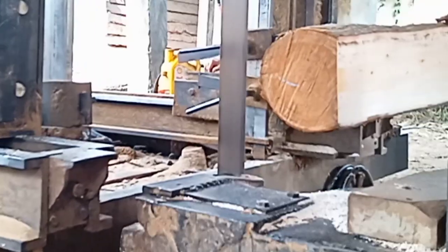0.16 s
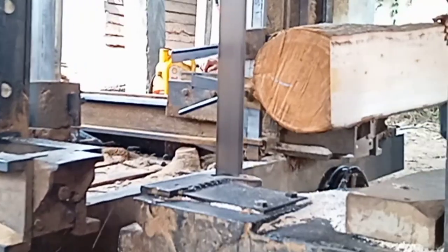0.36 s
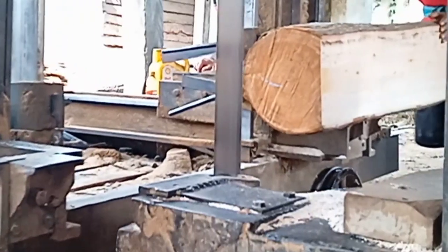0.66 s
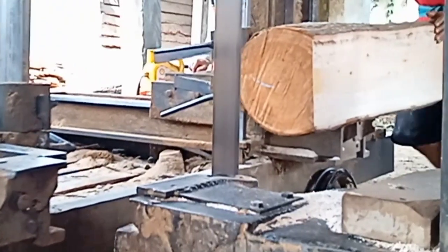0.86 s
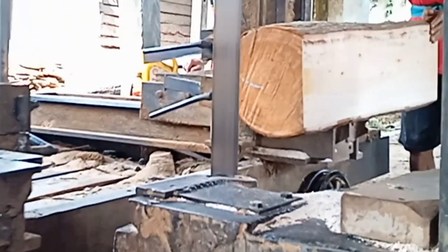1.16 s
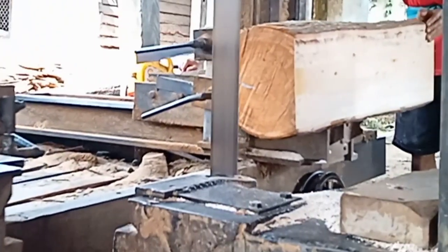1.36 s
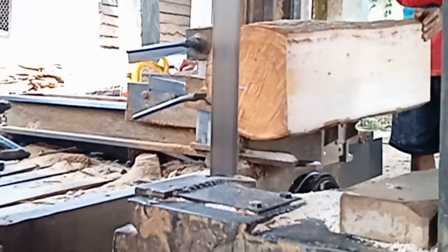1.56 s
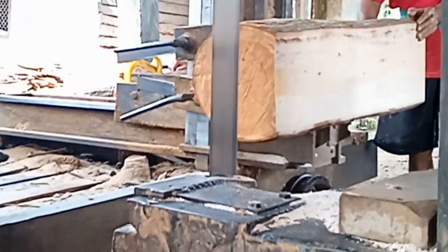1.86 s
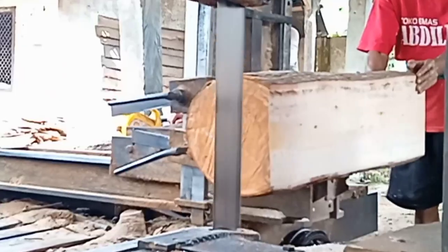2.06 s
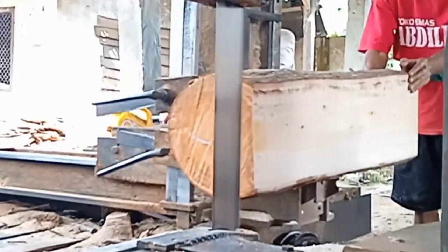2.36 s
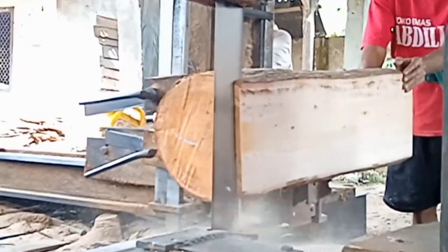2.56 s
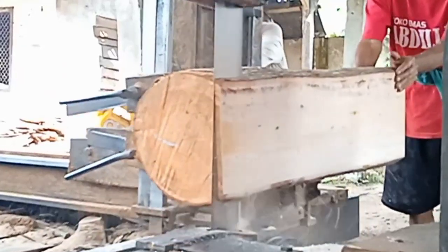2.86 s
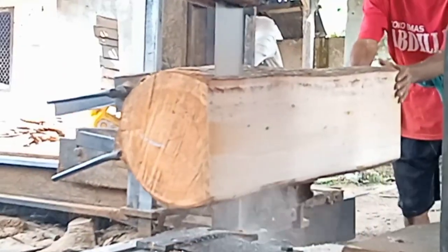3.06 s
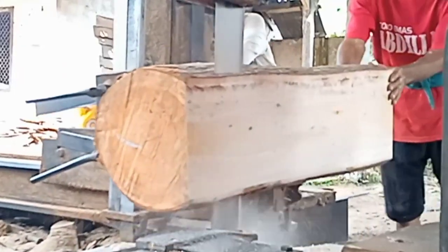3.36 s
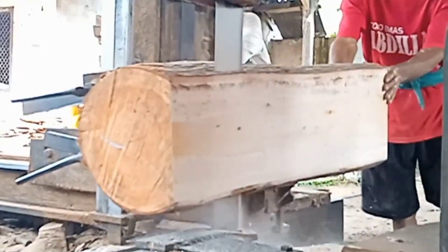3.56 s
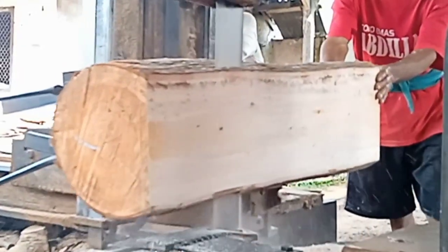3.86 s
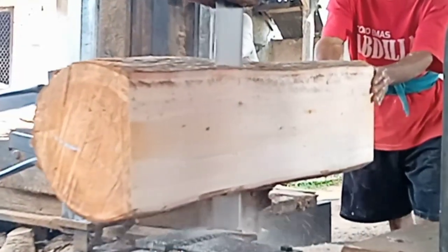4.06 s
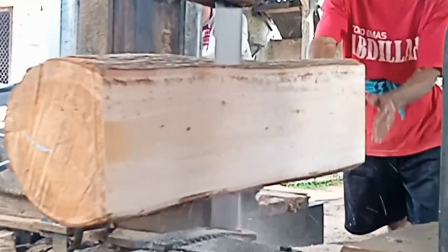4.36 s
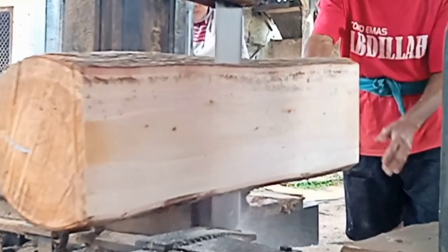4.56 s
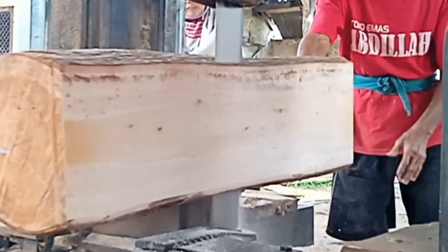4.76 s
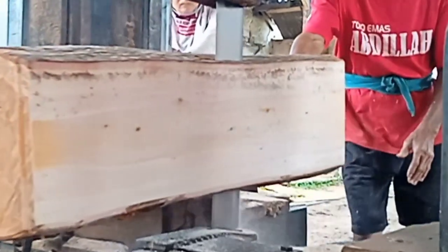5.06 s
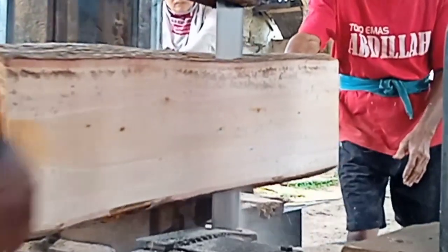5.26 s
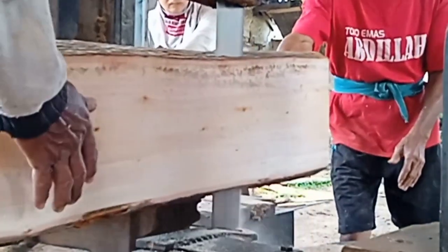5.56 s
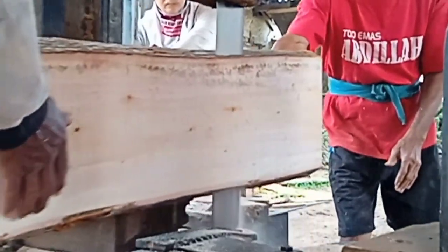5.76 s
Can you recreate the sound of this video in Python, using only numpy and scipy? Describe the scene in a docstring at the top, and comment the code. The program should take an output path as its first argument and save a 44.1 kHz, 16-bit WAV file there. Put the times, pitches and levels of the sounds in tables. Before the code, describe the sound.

A big band saw runs free with a bright ringing metallic hiss, then bites into a log, turning duller with wavering whines over sawdust hiss.

```python
"""A big band saw runs free in an open sawmill: its steel blade rings and throbs with each turn of the wheels.
Then a log is pushed in: the wood damps the ringing, the saw slows a little, and the teeth whine over sawdust hiss.
The ringing and hiss are shaped noise, and the whine is a stack of wavering tones at multiples of the tooth rate.
Throughout, the drive hums on steady tones while the housing, guards and frame rumble as noise-fed resonances."""
import sys
import numpy as np
from scipy import signal
from scipy.fft import rfft, irfft, next_fast_len
from scipy.io import wavfile
from scipy.ndimage import uniform_filter1d, map_coordinates

SR = 44100
rng = np.random.default_rng(int(sys.argv[2]) if len(sys.argv) > 2 else 0)


def materialize(psi):
    """Save the field psi as 16-bit PCM at rate SR to the path in sys.argv[1].

    A 1-D psi becomes a single channel; in a 2-D psi each row is a channel.
    """
    bounded = np.clip(np.atleast_2d(psi).T, -1, 1)
    quanta = np.round(bounded * 32767).astype(np.int16)
    wavfile.write(sys.argv[1], SR, quanta)


N = 261072

# In tables of resonances and noise colours, the levels are relative within the table.
# how fast teeth pass through the cut: time_s, teeth_per_s
TOOTH_SPEED = [(0, 1087), (2.5, 1087), (2.75, 1077), (3, 1071), (3.5, 1067), (3.9, 1064.5), (4.4, 1065),
               (5, 1067.5), (5.92, 1069)]
# resonances of the steel band: pitch_hz, width_hz, free_level_db, held_by_wood_level_db
BAND_MODES = [(1296, 125, -3, -6.5), (1365, 24, 2, -4), (1463, 46, -7, -22), (1721, 33, 2.5, -4.5),
              (1802, 92, -1, -1.5), (1885, 82, 1, -2.5), (1970, 28, 4, -4.5), (2084, 93, -1.5, 0),
              (2200, 48, -10, -16), (2297, 70, 0.5, -6), (2385, 44, -0.5, 1), (2420, 61, 0, -7),
              (2558, 81, 0.5, -7), (2646, 73, -1, -2), (2802, 79, 1, -3.5), (2917, 27, 1.5, -3),
              (3185, 81, -2.5, -4), (3300, 76, -1, -4), (3517, 70, -1, -8), (3790, 87, -1, -5.5),
              (3976, 82, -1, -6.5), (4780, 180, -5.5, -10.5), (5760, 480, -4.5, -13.5),
              (6620, 114, -3, -24), (6950, 110, -8.5, -26), (7450, 160, -8, -5), (7640, 89, -4, -19)]
# colour of the hiss of teeth in air: pitch_hz, level_db (per Hz)
AIR_COLOUR = [(900, -27), (1350, -3), (1600, 2.5), (2500, 5.5), (3020, 2.5), (3700, 6.5), (4300, 5),
              (5600, 5), (6200, 2), (7400, 4.5), (8100, 2), (9000, -2.5), (10800, -4.5), (12000, -10.5),
              (13900, -9), (15300, -3.5)]
# level of the band's ringing in the cut: time_s, level_db
CUT_RING = [(2.52, -30.5), (2.62, -30.5), (2.8, -30.5), (3.1, -29), (3.35, -29.5), (3.66, -29),
            (3.98, -29.5), (4.3, -30.5), (4.75, -30), (5.02, -32), (5.2, -30), (5.92, -31)]
# colour of the sawdust hiss: pitch_hz, level_db (per Hz)
DUST_COLOUR = [(900, -27), (1400, 2), (2500, 8.5), (3050, 2.5), (3800, 4.5), (5700, 4), (7600, 3),
               (8800, -1.5), (11000, -4), (13300, -9), (14300, -4.5), (15300, 0.5)]
# tooth harmonics 1 to 14 between swells, before they brighten: level_db
HARMONIC_LEVELS = [-56, -46, -45.5, -47.5, -45.5, -45.5, -47.5, -46.5, -52.5, -53, -54, -55, -61, -49]
# a harmonic sings out as the moving log tunes the blade to it: middle_s, length_s, harmonic, peak_db
SWELLS = [(2.6, .08, 14, -40), (2.7, .16, 13, -48.5), (2.73, .1, 14, -38), (2.752, .12, 5, -34.5),
          (2.772, .1, 7, -31), (2.82, .13, 12, -53), (2.84, 0.11, 9, -41), (2.84, .13, 10, -43.5),
          (2.93, .12, 7, -38), (3.16, 0.063, 6, -37), (3.17, .08, 7, -41), (3.2, .16, 14, -44.5),
          (3.358, 0.2, 5, -40), (3.39, 0.073, 7, -39), (3.42, 0.3, 4, -42), (3.54, 0.11, 5, -33),
          (3.625, 0.11, 5, -35.5), (3.627, 0.035, 3, -32.5), (3.64, .1, 2, -36.5), (3.64, .08, 9, -48),
          (3.67, .06, 7, -39), (3.68, 0.18, 6, -40.5), (3.71, 0.073, 8, -41), (3.79, 0.088, 1, -29),
          (3.81, .07, 4, -37), (3.873, 0.095, 1, -27), (3.905, 0.058, 7, -35.5), (3.922, 0.047, 5, -29.5),
          (3.923, .073, 6, -28), (4.053, 0.088, 6, -35), (4.1, .1, 9, -40), (4.09, .08, 10, -46),
          (4.182, .06, 8, -38), (4.33, .035, 3, -36), (4.41, .1, 8, -40), (4.48, 0.14, 5, -32.5),
          (4.5, 0.18, 9, -42), (4.517, 0.1, 4, -35.7), (4.578, .11, 1, -34.5), (4.58, .16, 11, -42),
          (4.735, .07, 4, -35), (4.78, .18, 10, -43), (4.82, .07, 14, -41), (4.85, .13, 13, -47),
          (4.867, .09, 7, -34), (4.9, 0.055, 3, -36.5), (4.91, 0.23, 6, -42), (5, 0.089, 9, -40.5),
          (4.95, 0.28, 1, -41), (5.037, .11, 7, -33), (5.1, .2, 5, -42.5), (5.11, .1, 4, -45.5),
          (5.2, 0.2, 6, -37.5), (5.2, .22, 12, -46.5), (5.25, .14, 10, -46), (5.28, .16, 11, -44.5),
          (5.32, .1, 7, -42), (5.33, 0.27, 8, -41), (5.35, .18, 9, -46), (5.313, .085, 1, -34.5),
          (5.43, .07, 1, -35), (5.4, 0.085, 4, -41), (5.56, .12, 6, -38.5), (5.62, .3, 12, -47),
          (5.673, 0.11, 5, -35.5), (5.72, 0.065, 9, -39), (5.72, .1, 8, -43), (5.74, 0.28, 7, -38),
          (5.815, 0.082, 6, -33), (5.84, 0.073, 4, -40), (5.91, .08, 7, -42), (5.9, .1, 8, -43)]
# brief harder scrapes on the band: middle_s, length_s, centre_hz, peak_db
SCRAPES = [(.094, .06, 2300, -30), (.254, .035, 3200, -29.5), (.645, .05, 2700, -28),
           (.69, .05, 1840, -29.5), (.808, .035, 1850, -28.5), (1.02, .09, 2550, -30.5),
           (1.23, .06, 2850, -31), (1.34, .05, 1900, -30), (1.493, .05, 1790, -29), (1.57, .06, 2600, -29),
           (1.79, .04, 3800, -29.5), (1.91, .04, 2000, -30), (2.46, .05, 3400, -31),
           (2.466, .05, 1940, -29), (3.47, .1, 2400, -33), (3.655, .05, 1830, -33), (4.755, .04, 1940, -33),
           (4.9, .03, 2550, -33), (5.197, .1, 1970, -34)]
# a wheel guard rings out: middle_s, length_s, pitch_hz, peak_db
GUARD_RINGS = [(0.118, 0.041, 701, -33), (0.423, 0.1, 642, -42), (1.065, .08, 645, -40),
               (2.88, 0.13, 629, -38.5), (5.31, 0.043, 750, -39), (5.528, 0.092, 820, -43.5),
               (5.66, .1, 905, -42), (5.73, 0.18, 734, -37.5)]
# steady tones of the drive: pitch_hz, level_db
DRIVE_HUM = [(99.5, -59), (144.5, -53.5)]
# resonances of the saw housing: pitch_hz, width_hz, level_db
HOUSING_MODES = [(278.6, 28, 2), (296.2, 21, 6), (340, 33, -5.5)]
# the housing booms: middle_s, length_s, rise_db
BOOMS = [(0.245, 0.052, 7.5), (3.625, 0.087, 6.5), (5.136, 0.069, 9.5), (5.597, 0.09, 2.5)]
# resonances of the wheel guards: pitch_hz, width_hz, level_db
GUARD_MODES = [(626.3, 13.4, 2), (643, 18, -3.5), (697, 28, 3.5), (746, 38, -0.5)]
# resonances of the frame: pitch_hz, width_hz, level_db
FRAME_MODES = [(492, 96, -9.5), (822, 29, -1), (889, 60, -2.5), (989, 11.4, 6), (1045.5, 28, 3),
               (1113, 30, 1), (1202, 48, 1.5)]
# colour of the low rumble: pitch_hz, level_db (per Hz)
RUMBLE_COLOUR = [(25, -39), (55, -21), (85, -15), (125, -8), (190, -2.5), (350, -3.5), (430, -5), (580, -5),
                 (900, -6.5), (1300, 0), (2500, -19.5)]

# the wood closes on the blade: start, time it takes, time until it grips hardest (s)
CONTACT_S, ENTRY_S, GRIP_S = 2.487, 0.045, 0.11
# usual levels: ringing and air hiss running free, sawdust hiss in the cut (dB)
FREE_RING_DB, AIR_DB, DUST_DB = -25, -26, -28
# dB of sawdust hiss for each dB of ringing in the cut
DUST_FOLLOWS = 0.86
# every harmonic wanders: depth (dB), changes per second; time the whine takes to build (s)
WANDER_DB, WANDER_RATE, BUILD_S = 1.5, 18, 0.36
# the whine flutters as the teeth catch: depth (dB), changes per second
FLUTTER_DB, FLUTTER_RATE = 1.2, 45
# steady rise of the 10th harmonic as the blade sinks in; others in proportion to their number (dB per second)
BRIGHTEN_DB_PER_S = 0.6
# roughness of a harmonic (0-1): between swells, at its purest, and the rise for each harmonic number
REST_ROUGH, SWELL_ROUGH, ROUGH_PER_ORDER = 0.5, 0.1, 0.03
# how far a scrape reaches to either side of its centre (Hz)
SCRAPE_REACH_HZ = 570
# usual shaking of the machine, and the guards' change once the wood calms them (dB)
HOUSING_DB, GUARDS_DB, FRAME_DB, GUARDS_HELD_DB = -44, -39, -37.5, -3
# how often a second the energy shifts between groups of resonances
SWAY_RATE = 26
# spray and air come in uneven gusts: depth (dB), width (Hz), duration (s)
PATCH_DB, PATCH_HZ, PATCH_S = 1.6, 450, 0.035
# no sound is kept from here up (Hz)
TOP_HZ = 15520


def free_blade(teeth):
    """The running band scrapes its guides and its resonances flutter; the teeth hiss through the air."""
    modes = [(hz, width, free_db) for hz, width, free_db, _ in BAND_MODES]
    ringing = ring(rng.standard_normal(N), modes, sway_db=2.0, count=9)
    steel = amp(FREE_RING_DB + 0.26 * wobble(28.35)) * ringing
    air = amp(AIR_DB + 0.53 * wobble(60)) * patchy(rush(AIR_COLOUR))
    return (steel + air) * throb(teeth, wheel_db=0.25)


def cutting(teeth):
    """Each tooth tears off a chip: the damped band rings and sawdust sprays out of the cut."""
    ring_db, = curves(CUT_RING)
    ring_db = ring_db + 0.4 * wobble(28)
    modes = [(hz, width, held_db) for hz, width, _, held_db in BAND_MODES]
    # one pulse of force for each tooth
    tearing = 1 + 0.38 * np.cos(2 * np.pi * teeth)
    ringing = ring(tearing * rng.standard_normal(N), modes, sway_db=1.5, count=7)
    steel = amp(ring_db) * ringing
    # unevenly set teeth make the spray flutter
    flutter = 1 + 0.07 * np.cos(2 * np.pi * teeth / 10.1)
    spray = unit(flutter * tearing * patchy(rush(DUST_COLOUR)))
    spray_db = DUST_DB + DUST_FOLLOWS * (ring_db - ring_db.mean()) - 0.49 * grip()
    dust = amp(spray_db + 1.1 * wobble(120)) * spray
    return (steel + dust) * throb(teeth, wheel_db=0.15)


def whine(teeth):
    """Teeth strike the wood about a thousand times a second; each harmonic wanders and turns purer as it swells."""
    sound = np.zeros(N)
    brighten_db = BRIGHTEN_DB_PER_S * (np.arange(N) / SR - CONTACT_S)
    for order, level_db in enumerate(HARMONIC_LEVELS, 1):
        rest_db = level_db + brighten_db * order / 10 + WANDER_DB * wobble(WANDER_RATE)
        rest = amp(rest_db) * ramp(CONTACT_S, BUILD_S)
        sung_power = sum((amp(peak_db) * swell(middle, length)) ** 2
                         for middle, length, harmonic, peak_db in SWELLS if round(harmonic) == order)
        power = rest ** 2 + sung_power
        # share of the power that comes from swells
        purity = sung_power / (power + 1e-20)
        rough = (1 - purity) * REST_ROUGH + purity * (SWELL_ROUGH + ROUGH_PER_ORDER * order)
        flutter = amp(FLUTTER_DB * wobble(FLUTTER_RATE))
        sound += np.sqrt(power) * flutter * tooth_tone(teeth, order, rough)
    return sound


def tooth_tone(teeth, order, rough):
    """One harmonic of the tooth rate, blurred by the grain; uneven tooth spacing adds sidebands."""
    blur = 1 + rough * (wobble(70) + 1j * wobble(70))
    blur = blur / np.sqrt(1 + 2 * rough ** 2)  # keeps the average power even
    spacing = 0.038 * order * wobble(65)
    cycles = order * teeth + rng.random()
    return unit(np.real(blur * np.exp(1j * spacing + 2j * np.pi * cycles)))


def throb(teeth, wheel_db):
    """Loudness that swings with each turn of the wheels."""
    wheel_turns = teeth / 90  # 90 teeth pass in one turn
    return amp(wheel_db * np.cos(2 * np.pi * wheel_turns))


def scrapes():
    """Brief harder rubs on the band, each lighting up the resonances near one pitch."""
    modes = [(hz, width, free_db) for hz, width, free_db, _ in BAND_MODES]
    ringing = ring(rng.standard_normal(N), modes, sway_db=1.5, count=1)
    sound = np.zeros(N)
    for middle, length, centre, peak_db in SCRAPES:
        region = filtered(ringing, lambda f: 1 / (1 + ((f - centre) / SCRAPE_REACH_HZ) ** 4))
        sound += amp(peak_db) * bump(middle, length) * unit(region)
    return sound


def guard_rings():
    """A guard panel sings briefly at one wavering pitch."""
    t = np.arange(N) / SR
    sound = np.zeros(N)
    for middle, length, hz, peak_db in GUARD_RINGS:
        tone = amp(5.6 * wobble(45)) * np.sin(2 * np.pi * hz * t + 0.6 * wobble(45))
        sound += amp(peak_db) * bump(middle, length) * unit(tone)
    return sound


def machine(teeth, bite):
    """The running wheels shake the housing, guards and frame, over the hum of the drive and a low rumble."""
    housing_db = housing_level(teeth)
    guards_db = GUARDS_DB + GUARDS_HELD_DB * bite + 1.3 * wobble(12) - 4.9 * grip()
    # the frame takes up part of the guards' shaking
    frame_db = FRAME_DB + 0.077 * (guards_db - guards_db.mean())
    housing = amp(housing_db) * ring(rng.standard_normal(N), HOUSING_MODES, sway_db=0.5)
    guards = amp(guards_db) * ring(rng.standard_normal(N), GUARD_MODES, sway_db=0.4)
    frame = amp(frame_db) * ring(rng.standard_normal(N), FRAME_MODES, sway_db=2.0)
    rumble = amp(-40.0 + 2.4 * wobble(8.2)) * rush(RUMBLE_COLOUR)
    return drive_hum() + housing + guards + frame + rumble


def housing_level(teeth):
    """The housing's boom, in dB, swells twice with each lap of the blade loop, plus single booms."""
    lap = np.cos(4 * np.pi * teeth / 298)  # 298 teeth in the loop
    level_db = HOUSING_DB + 0.55 * lap + 2.4 * wobble(14) - 5 * grip()
    return level_db + sum(rise_db * bump(middle, length) for middle, length, rise_db in BOOMS)


def drive_hum():
    """The drive hums on steady low tones that waver a little in level and phase."""
    t = np.arange(N) / SR
    hum = np.zeros(N)
    for hz, level_db in DRIVE_HUM:
        level = amp(level_db + 1.8 * wobble(9.8))
        hum += level * np.sqrt(2) * np.sin(2 * np.pi * hz * t + 0.18 * wobble(8))
    return hum


def grip():
    """Rises and falls as the wood first grips the band; used to quieten the dust, housing and guards."""
    return bump(CONTACT_S + GRIP_S, GRIP_S)


def ring(drive, modes, sway_db, count=4):
    """Resonances shaken by a force, rms 1; the energy wanders between groups of them."""
    def response(group, f):
        # each peak is a tight cluster of resonances, so its flanks are steep
        power = sum(amp(2 * db) / (1 + ((f - hz) / (0.55 * width)) ** 2) ** 2 for hz, width, db in group)
        return np.sqrt(power)

    sound = np.zeros(N)
    count = min(count, len(modes))
    for i in range(count):
        group = modes[i::count]
        sway = amp(sway_db * wobble(SWAY_RATE))
        sound += sway * filtered(drive, lambda f: response(group, f))
    return unit(sound)


def rush(colour):
    """Noise of rms 1 with a smooth spectrum."""
    f, db = np.transpose(colour)
    return unit(filtered(rng.standard_normal(N), lambda hz: amp(np.interp(np.log(hz + 1), np.log(f), db))))


def patchy(x):
    """Noise of rms 1 in which regions of the spectrum flutter separately."""
    hz, t, z = signal.stft(x, SR, nperseg=512)
    # random gains, smoothed across pitch and then across time
    field = uniform_filter1d(rng.standard_normal(z.shape), round(PATCH_HZ / hz[1]), axis=0)
    field = uniform_filter1d(field, round(PATCH_S / t[1]), axis=1)
    gusts = signal.istft(z * amp(PATCH_DB * unit(field)), nperseg=512)[1]
    return unit(gusts[:N])


def swell(middle, length):
    """A resonance builds and dies away: height 1, with long skirts."""
    return 1 / np.cosh(np.clip(2 * (np.arange(N) / SR - middle) / length, -20, 20))


def bump(middle, length):
    """A smooth rise and fall of height 1."""
    return np.exp(-2 * ((np.arange(N) / SR - middle) / length) ** 2)


def ramp(start, length):
    """A straight rise from 0 to 1."""
    return np.clip((np.arange(N) / SR - start) / length, 0, 1)


def wobble(rate):
    """A smooth random curve around 0, through rate random points a second."""
    knots = rng.standard_normal(int(N * rate / SR) + 4)
    coarse = np.arange(0, N + 32, 32)  # worked out at every 32nd sample
    return np.interp(np.arange(N), coarse, map_coordinates(knots, [coarse * rate / SR]))


def curves(rows):
    """One value per sample for each column after the time."""
    s, *cols = np.transpose(rows)
    return [np.interp(np.arange(N) / SR, s, c) for c in cols]


def filtered(x, response):
    """Sound x with each frequency scaled by response."""
    size = next_fast_len(N + SR // 2)
    return irfft(rfft(x, size) * response(np.fft.rfftfreq(size, 1 / SR)), size)[..., :N]


def amp(db):
    """Decibels to gain."""
    return 10 ** (np.asarray(db) / 20)


def unit(x):
    """Scale to rms 1."""
    return x / np.sqrt(np.mean(x ** 2) + 1e-20)


def scene():
    """The free blade gives way to the cut; both channels carry the same sound."""
    teeth = np.cumsum(curves(TOOTH_SPEED)[0]) / SR  # teeth passed so far
    bite = ramp(CONTACT_S, ENTRY_S)
    free = np.sqrt(1 - bite) * free_blade(teeth)
    cut = np.sqrt(bite) * (cutting(teeth) + whine(teeth))
    mono = free + cut + scrapes() + guard_rings() + machine(teeth, bite)
    return np.tile(mono, (2, 1))


def record(dry):
    """Nothing is kept from the top frequency up."""
    return filtered(dry, lambda hz: hz < TOP_HZ)


dry = scene()
out = record(dry)
materialize(out)
```